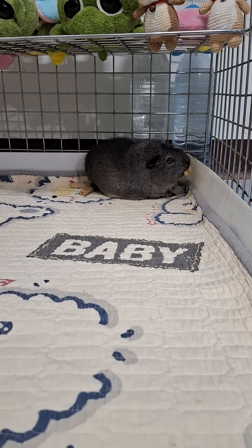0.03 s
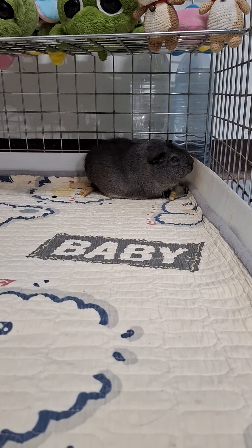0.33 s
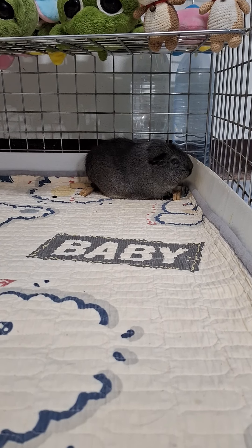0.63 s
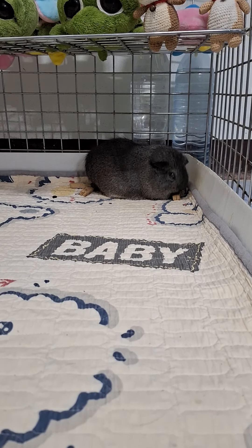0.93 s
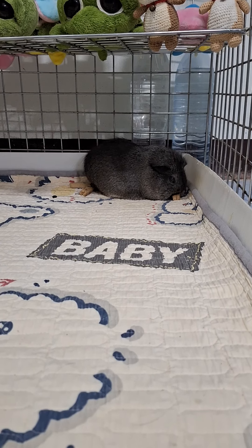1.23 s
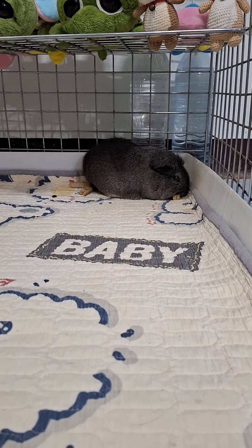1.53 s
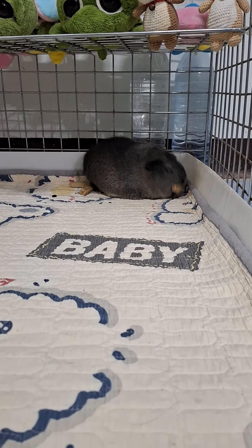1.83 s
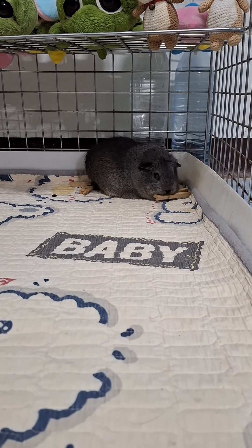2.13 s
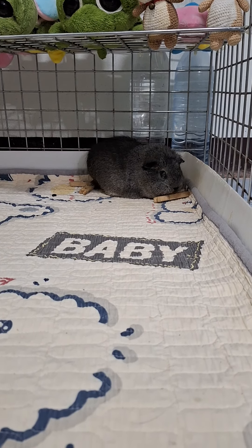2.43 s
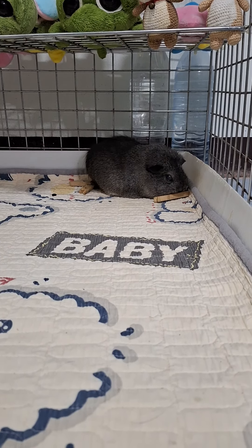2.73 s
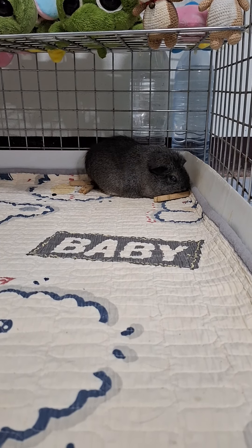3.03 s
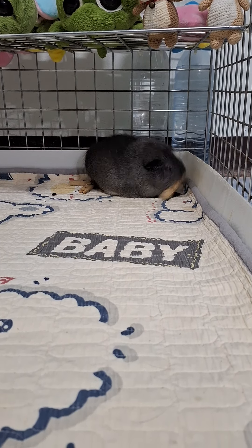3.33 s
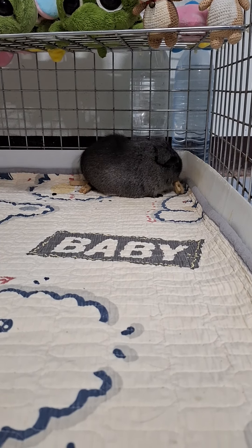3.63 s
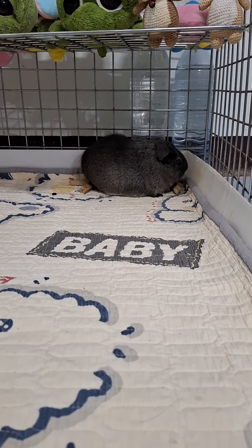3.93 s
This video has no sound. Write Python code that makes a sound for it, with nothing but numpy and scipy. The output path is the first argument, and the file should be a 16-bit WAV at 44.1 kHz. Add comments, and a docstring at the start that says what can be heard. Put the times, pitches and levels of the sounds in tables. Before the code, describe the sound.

A wooden chew stick knocks sharply against a pen wall at about 2 seconds, with a quick rattle and a short hollow boom fading by 2.5 seconds. A faint thud dies away at the very start. A guinea pig's very faint nibbles and soft scrapes come now and then, clearest around 1.8 seconds. A low fan hum runs quietly throughout in the small room.

```python
"""A small, quiet room: a guinea pig flings a wooden chew stick against the wall of its pen.
Stick and wall ring as damped modes: a clack, a rattle and a brief boom, with noise ticks at contact.
The room answers with decaying diffuse noise; an earlier knock is dying away at the start.
The animal nibbles and nudges the stick (faint noise bursts) over a ventilation fan's low hum."""
import sys
import numpy as np
from scipy import signal
from scipy.fft import rfft, irfft
from scipy.io import wavfile

SR = 44100
rng = np.random.default_rng(int(sys.argv[2]) if len(sys.argv) > 2 else 0)


def dump(signal):
    """Clip the signal to [-1, 1] and save it as 16-bit WAV at the path in sys.argv[1]."""
    limited = np.clip(np.atleast_2d(signal).T, -1, 1)
    pcm = np.round(limited * 32767).astype(np.int16)
    wavfile.write(sys.argv[1], SR, pcm)


N = 176400


def amp(db):
    """Decibels to gain."""
    return 10 ** (np.asarray(db) / 20)

def unit_rms(x):
    """Scale to rms 1."""
    return x / np.sqrt(np.mean(x ** 2) + 1e-20)

def curve_at(points, hz):
    """Interpolate a table over log frequency."""
    freq_hz, value = np.transpose(points)
    return np.interp(np.log(hz + 1), np.log(freq_hz + 1), value)

def pan(left_minus_right_db):
    """Left and right gains."""
    return amp(np.array([[.5], [-.5]]) * left_minus_right_db)

def add(mix, start_s, sound):
    """Mix a sound in at start_s."""
    part = mix[:, max(round(start_s * SR), 0):][:, :sound.shape[-1]]
    part += sound[..., :part.shape[1]]

def wander(rate_hz):
    """Low-passed random motion, rms 1."""
    hz = np.fft.rfftfreq(N, 1 / SR)
    lowpass = np.exp(-(hz / rate_hz) ** 2)
    return unit_rms(irfft(rfft(rng.standard_normal(N)) * lowpass, N))

def ring(modes, rise_s):
    """Damped modes excited by a blow."""
    t = np.arange(SR) / SR
    swing = sum(amp(db) * np.exp(-np.log(1000) * t / t60_s) * np.sin(2 * np.pi * hz * t)
                for hz, db, t60_s in modes)
    return swing * (1 - np.exp(-(t / rise_s) ** 2))


# left-right likeness of the room's field: freq_hz, coherence
COHERENCE = [(60, 0.77), (130, .95), (290, 1), (640, -0.43), (1400, -0.034), (3100, -0.077),
             (15000, -0.025)]

def diffuse(spectrum, size, balance=((1, 0),)):
    """Coloured stereo noise arriving from all round, rms 1."""
    hz = np.fft.rfftfreq(size, 1 / SR)
    mid, side = rfft(rng.standard_normal((2, size)))
    coherence = np.clip(curve_at(COHERENCE, hz), -1, 1)
    mid, side = mid * np.sqrt(1 + coherence), side * np.sqrt(1 - coherence)
    coloured = np.array([mid + side, mid - side]) * amp(curve_at(spectrum, hz))
    return unit_rms(irfft(coloured * pan(curve_at(balance, hz)), size))


# hum lines: pitch_hz, rms_db
FAN_HUM = [(53.5, -67), (72, -60.5), (144.5, -59.5), (195, -68), (398, -81.5), (483, -72)]
# air rumble and hiss: freq_hz, relative_density_db
AIR_SPECTRUM = [(12, -42), (25, -19.5), (32, -17), (42, 1), (60, -2.5), (80, -1), (100, -3.5), (120, -13),
                (170, -13), (208, -3.5), (250, -14), (364, -19.5), (490, -20), (570, -23.5), (750, -27.5),
                (1000, -37.5), (1400, -43.5), (2400, -45), (3500, -48.5), (5200, -50.5), (6800, -55),
                (8500, -52), (10500, -51.5), (13000, -49.5), (15700, -48.5)]
# balance of air and hum: freq_hz, left_minus_right_db
FAN_BALANCE = [(30, 4.5), (60, 1.3), (130, 3.2), (300, -7), (1000, 0.5), (15000, 0)]

def fan(air_db=-55.5, swell_db=0.25, waver_depth=0.2, waver_hz=11, drift_rad=0.21):
    """Wavering hum lines in a low rush of air."""
    t = np.arange(N) / SR
    out = amp(air_db - swell_db * wander(rate_hz=3.4)) * diffuse(AIR_SPECTRUM, N, FAN_BALANCE)
    for pitch_hz, rms_db in FAN_HUM:
        phase = 2 * np.pi * (pitch_hz * t + rng.random()) + drift_rad * wander(waver_hz)
        line = np.sqrt(2) * np.sin(phase) * (1 + waver_depth * wander(waver_hz))
        out += amp(rms_db) * line * pan(curve_at(FAN_BALANCE, pitch_hz))
    return out


def scrape_envelope(size, decay_s, rise_s=0.0029):
    """Quick linear rise, exponential fade."""
    t = np.arange(size) / SR
    return np.minimum(t / rise_s, 1) * np.exp(-t / decay_s)


# teeth and claws on the stick: start_s, decay_s, squeak_db, squeak_hz, hiss_db
NIBBLE_EVENTS = [(0.434, 0.043, -86, 7600, -89), (0.477, 0.025, -80, 7700, -86),
                 (0.493, .03, -84, 6400, -89), (1.76, .005, -77, 7600, -92), (1.773, .035, -79, 7700, -96),
                 (2.795, 0.087, -86.5, 8340, -87), (3.539, 0.13, -90, 8340, -90),
                 (3.619, 0.021, -84, 8140, -89)]

def nibbles(size=16384, squeak_width_hz=420, hiss_hz=11000, hiss_width_hz=4000):
    """Teeth and claws rub wood: a thin squeak band plus hiss."""
    out, hz = np.zeros((2, N)), np.fft.rfftfreq(size, 1 / SR)
    hiss = unit_rms(np.exp(-((hz - hiss_hz) / hiss_width_hz) ** 2))
    for start_s, decay_s, squeak_db, squeak_hz, hiss_db in NIBBLE_EVENTS:
        squeak = unit_rms(1 / (1 + ((hz - squeak_hz) / squeak_width_hz) ** 2))
        spectrum = np.hypot(amp(squeak_db) * squeak, amp(hiss_db) * hiss)
        rub = irfft(rfft(rng.standard_normal((2, size))) * spectrum)
        add(out, start_s, rub * scrape_envelope(size, decay_s) * pan(left_minus_right_db=7))
    return out


# shoves of the stick: start_s, decay_s, level_db
NUDGE_EVENTS = [(.378, 0.074, -66), (0.939, 0.074, -68), (1.138, 0.018, -69.5), (1.762, 0.016, -54.5),
                (1.782, 0.028, -57), (1.791, 0.026, -61), (1.844, 0.12, -63), (3.294, 0.07, -68.5)]
# stick-on-mat friction: freq_hz, relative_density_db
NUDGE_SPECTRUM = [(150, 3.5), (550, 6.5), (900, -6.5), (1300, -7), (1600, -14.5), (2200, -19),
                  (4000, -31.5), (12000, -44)]

def nudges(size=16384):
    """The stick slides over the mat in soft, dull scrapes."""
    out = np.zeros((2, N))
    for start_s, decay_s, level_db in NUDGE_EVENTS:
        add(out, start_s, amp(level_db) * diffuse(NUDGE_SPECTRUM, size) * scrape_envelope(size, decay_s))
    return out


# reverberation time: freq_hz, t60_s
ROOM_DECAY = [(150, .38), (800, 0.34), (2000, 0.25), (5000, 0.29), (15000, 0.27)]

def room_decay(x, hold_s):
    """After a hold, each band fades at the room's rate."""
    hz, t, bands = signal.stft(x, SR, nperseg=256)
    t60_s = curve_at(ROOM_DECAY, hz)[:, None]
    fade = np.exp(-np.log(1000) * np.maximum(t - hold_s, 0) / t60_s)
    return signal.istft(bands * fade, SR)[1][:, :N]


# earlier knock's echo: freq_hz, relative_density_db
EARLIER_SPECTRUM = [(100, -7.5), (260, 3), (330, -18), (430, 6), (560, -4), (700, -5.5), (1100, -13.5),
                    (1500, -10), (2300, -14), (3500, -23.5), (6500, -32), (8500, -29.5), (11000, -37.5),
                    (15500, -38)]
# earlier knock's thud: pitch_hz, level_db, t60_s
EARLIER_MODES = [(245, -43, 0.08), (429.4, -38.5, 0.064), (537, -47, 0.061), (752, -46, 0.037),
                 (980, -55, 0.069), (2210, -56.5, 0.11)]

def earlier_knock(echo_db=-45.5):
    """A faint thud and its echo dying away at the start."""
    out = amp(echo_db) * room_decay(diffuse(EARLIER_SPECTRUM, N), hold_s=0)
    add(out, 0, ring(EARLIER_MODES, rise_s=0.0023))
    return out


# reflections: freq_hz, relative_density_db
ECHO_SPECTRUM = [(100, -6), (200, -4), (300, 3), (400, -11), (560, -10.5), (800, -1.5), (1020, -10.5),
                 (1300, -22), (1650, -10.5), (2700, -21), (3600, -25.5), (5500, -28.5), (8300, -31.5),
                 (9800, -35), (12000, -28), (13800, -38.5), (15400, -24.5)]
# their balance: freq_hz, left_minus_right_db
ECHO_PAN = [(150, 4.5), (800, -2), (2400, 2.5), (6000, 2.5), (10000, 0.5), (13000, -13), (15500, -7)]

def room_echo(knock_s, level_db=-39.5, delay_s=0.001, rise_s=0.014, grain_db=1.0):
    """Dense, uneven room reflections of the knock."""
    out, t = np.zeros((2, N)), np.arange(N) / SR
    reflections = diffuse(ECHO_SPECTRUM, N, ECHO_PAN)
    grain = unit_rms(amp(grain_db * wander(rate_hz=500)))
    swell = np.sqrt(np.minimum(t / rise_s, 1))
    add(out, knock_s + delay_s, amp(level_db) * swell * room_decay(reflections * grain, hold_s=0.04))
    return out


def tick(spectrum, size=1024, peak_s=0.00032):
    """Brief crunch of two hard surfaces meeting."""
    t = np.arange(size) / SR
    return diffuse(spectrum, size) * t / peak_s * np.exp(-t / peak_s)


# stick-end contacts: start_s, gain_db
CLICK_EVENTS = [(.8194, -63), (.9844, -56), (2.0148, -41), (2.0238, -41), (2.046, -47), (2.0762, -34.5)]
# stick-end click: freq_hz, relative_density_db
CLICK_SPECTRUM = [(100, -22), (6000, -20), (9000, -19), (12000, -5), (14000, -3), (15500, -2)]

def stick_clicks():
    """Small, hard clicks of the stick's end."""
    out = np.zeros((2, N))
    for start_s, gain_db in CLICK_EVENTS:
        add(out, start_s, amp(gain_db) * tick(CLICK_SPECTRUM))
    return out


# stick-on-wall strikes: start_s, clack_gain_db, boom_gain_db, tick_gain_db
STRIKES = [(1.9854, -24, -34, -25), (2.0033, -44, -56, -38), (2.0133, -43, -38, -40)]
# stick clack: pitch_hz, relative_db, t60_s
STICK_MODES = [(654, -10, 0.037), (812, 3.5, 0.029), (866, -8, 0.05), (938, -4, 0.026), (1006, -22, 0.068),
               (1507, -21.5, 0.058), (1660, -26, 0.068), (1973, -40.5, 0.038), (2225, -32.5, 0.049),
               (2780, -17, 0.026)]
# pen wall boom: pitch_hz, relative_db, t60_s
WALL_MODES = [(223.3, -8, 0.35), (259, -5.5, 0.41), (295.1, 0.5, 0.29), (444.5, -9.5, .42),
              (521.7, -16, 0.32), (815, -13, 0.29), (854, -15.5, .22), (926, -14.5, 0.21),
              (1013, -18, 0.18), (1620, -20, 0.29)]
# contact tick: freq_hz, relative_density_db
TICK_SPECTRUM = [(100, -8), (1000, -0.5), (2500, 13), (5000, -1.5), (8300, 5), (11500, 2), (14000, 1.5),
                 (16000, 12.5)]

def knock(ring_lag_s=0.00073, left_lead_s=0.00013):
    """The stick strikes and rebounds; stick and wall ring just after each contact."""
    out = np.zeros((2, N))
    clack = ring(STICK_MODES, rise_s=0.0023) * pan(left_minus_right_db=-5.5)
    boom = ring(WALL_MODES, rise_s=0.0021) * pan(left_minus_right_db=-3.2)
    for start_s, clack_gain_db, boom_gain_db, tick_gain_db in STRIKES:
        left, right = amp(clack_gain_db) * clack + amp(boom_gain_db) * boom
        add(out[:1], start_s + ring_lag_s - left_lead_s, left)
        add(out[1:], start_s + ring_lag_s, right)
        add(out, start_s, amp(tick_gain_db) * tick(TICK_SPECTRUM) * pan(left_minus_right_db=2))
    return out


def scene():
    """All sources, heard from the front of the pen."""
    return (fan() + knock() + stick_clicks() + room_echo(knock_s=STRIKES[0][0])
            + earlier_knock() + nibbles() + nudges())

def record(dry, cutoff_hz=15850):
    """Steep low-pass band limit."""
    lowpass = signal.firwin(511, cutoff_hz, window=("kaiser", 9), fs=SR)
    return signal.oaconvolve(dry, lowpass[None], "same")


dry = scene()
out = record(dry)
dump(out)
```